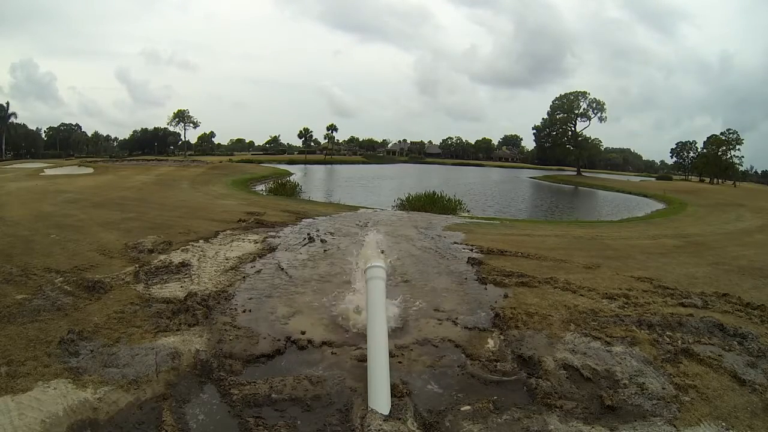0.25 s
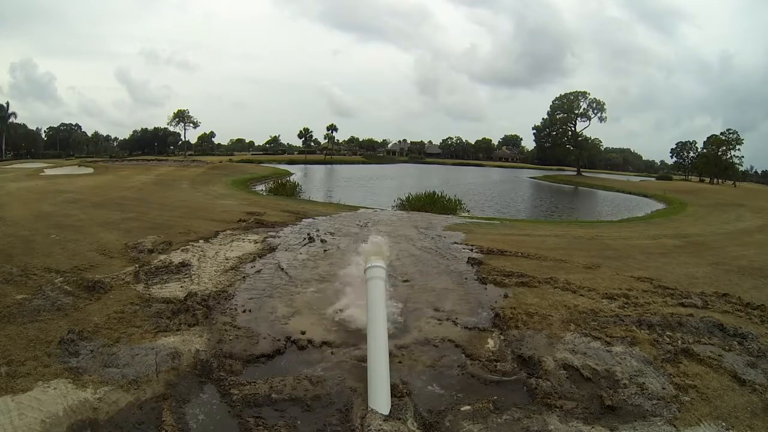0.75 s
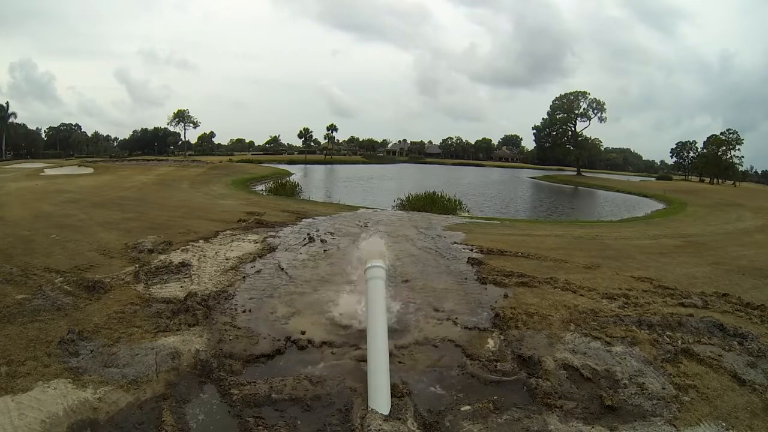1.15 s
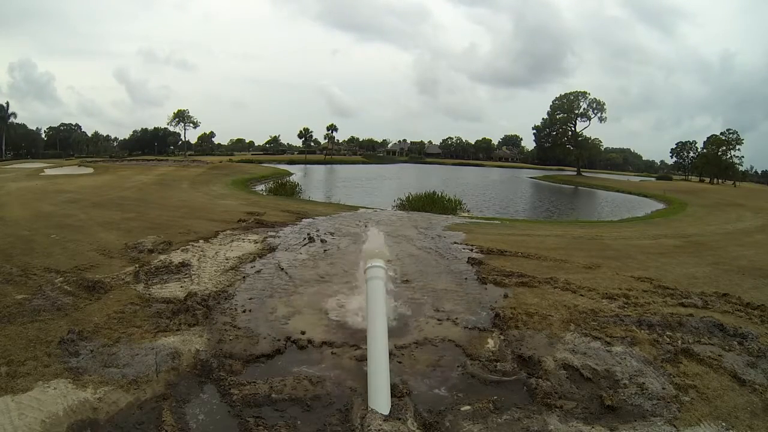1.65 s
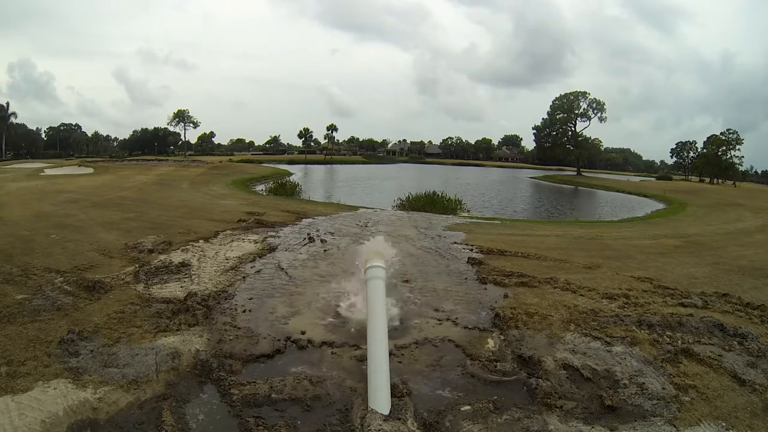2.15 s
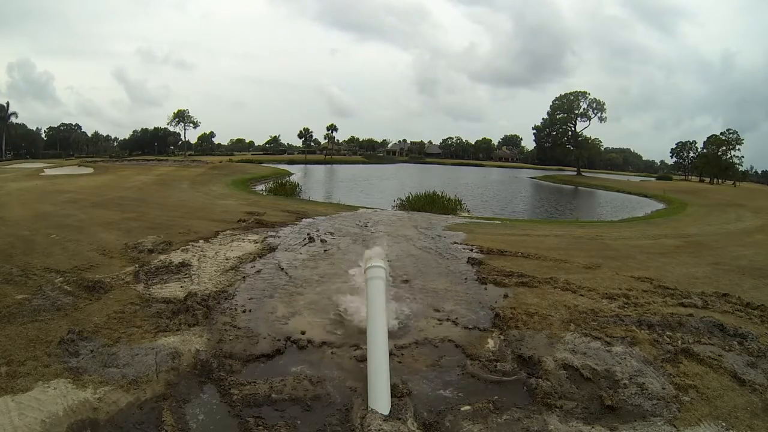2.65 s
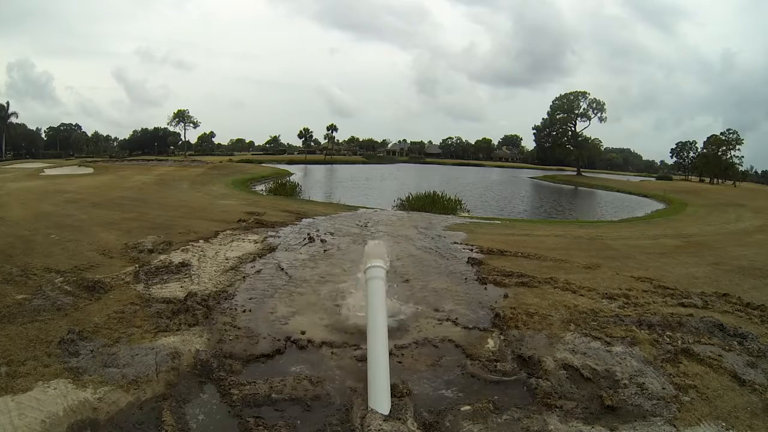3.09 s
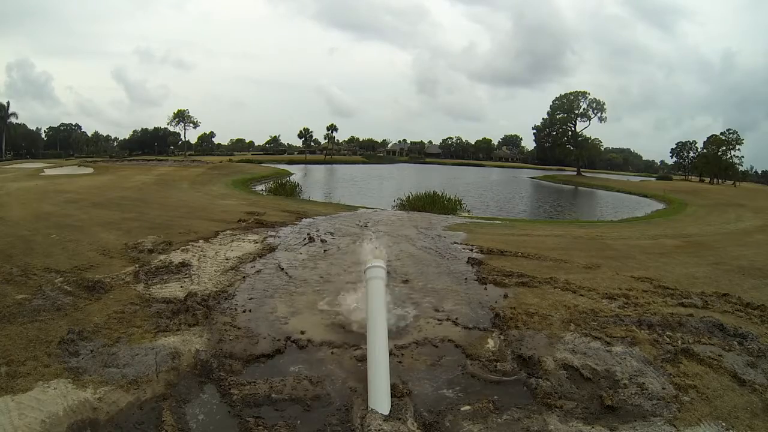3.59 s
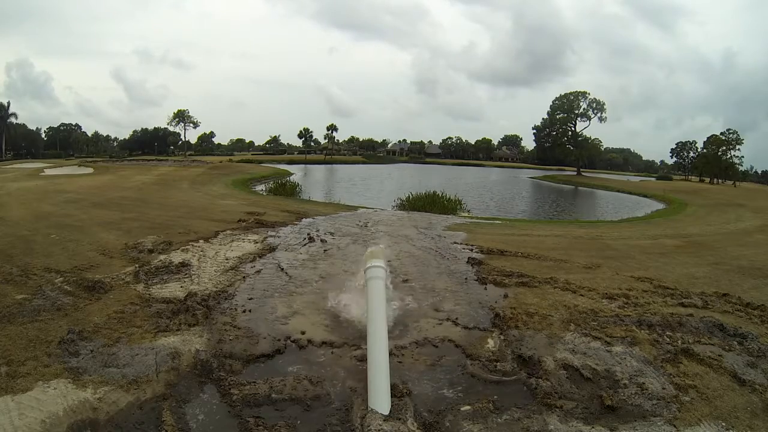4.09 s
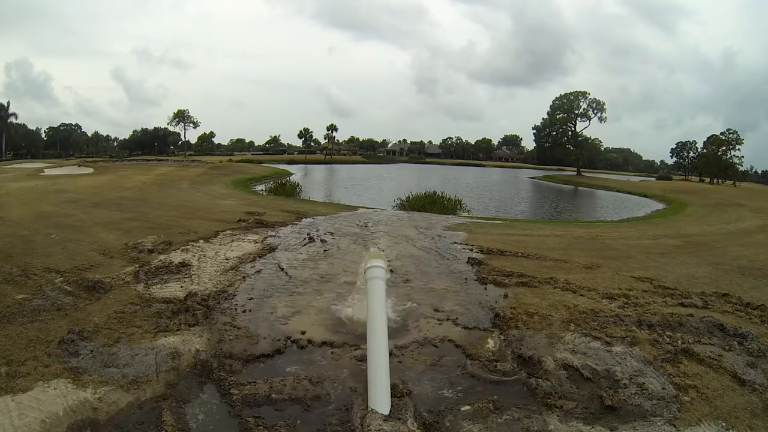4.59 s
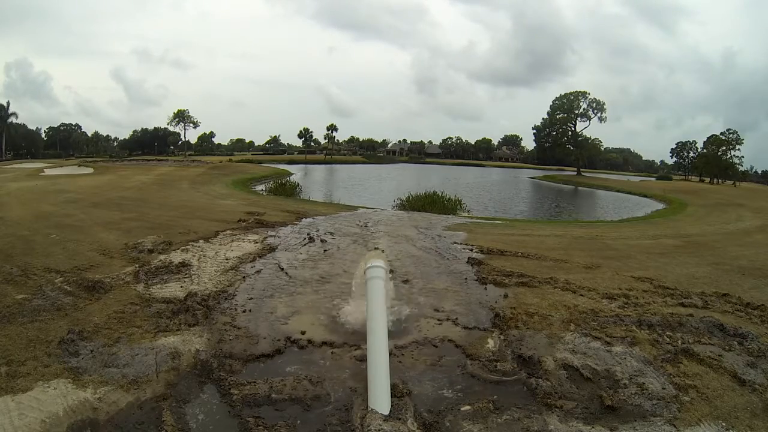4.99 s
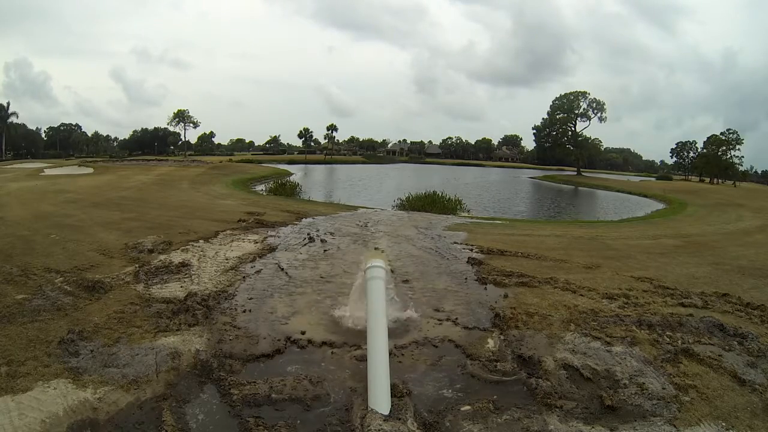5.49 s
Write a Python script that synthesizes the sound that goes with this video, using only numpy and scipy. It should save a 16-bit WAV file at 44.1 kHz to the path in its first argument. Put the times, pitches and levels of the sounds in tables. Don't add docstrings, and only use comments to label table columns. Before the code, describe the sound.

Outdoors on open ground, a broken stream of water pours steadily onto mud near a small encased camera. Low gurgling and mid splashing fluctuate throughout; air pockets gloop and plop, and slaps grow more frequent after about two seconds. Behind are soil thuds, a low steady engine hum and soft wind buffeting. Mono, dry, coloured by case resonances, with dull extreme treble.

```python
import sys
import numpy as np
from scipy import signal
from scipy.fft import rfft, irfft
from scipy.io import wavfile
from scipy.ndimage import uniform_filter1d, map_coordinates

SR = 44100
rng = np.random.default_rng(int(sys.argv[2]) if len(sys.argv) > 2 else 0)


def unload_wav(signal):
    wavfile.write(
        sys.argv[1],
        SR,
        np.round(np.clip(np.atleast_2d(signal).T, -1, 1) * 32767).astype(np.int16),
    )


def ratio_of_db(decibels):
    return 10 ** (np.asarray(decibels, float) / 20)


N = 253134


def unit(x):
    return x / np.sqrt(np.mean(x ** 2) + 1e-20)


def curves(rows):
    s, *cols = np.transpose(rows)
    return [np.interp(np.arange(N) / SR, s, c) for c in cols]


def wobble(rate):
    knots = rng.standard_normal(400 + N // 100)
    return map_coordinates(knots, [np.arange(N) * min(rate, 400) / SR])


def coloured(x, spectrum):
    m = 2 ** 14
    f, db = np.transpose(spectrum)
    log_f = np.log(np.fft.rfftfreq(m, 1 / SR) + 1)
    gain = ratio_of_db(np.interp(log_f, np.log(f + 1), db)) + 1e-6
    ceps = irfft(np.log(unit(gain)))
    ceps[1:m // 2] *= 2
    ceps[m // 2 + 1:] = 0
    return signal.fftconvolve(x, irfft(np.exp(rfft(ceps))))[:N]


def swells(events, lean, steady_db):
    s, length, db, character = np.transpose(events)[:, :, None]
    t = np.arange(0, N + 64, 64) / SR
    shape = np.exp(-8 * ((t - s) / np.maximum(length, .03)) ** 2)
    bells = ratio_of_db(db + lean * character) ** 2 * shape
    gain = np.sqrt(ratio_of_db(steady_db) ** 2 + bells.sum(0))
    return np.interp(np.arange(N) / SR, t, gain)


WHISTLE_HZ, STEP_HZ = 10645.3, 47.97
WHISTLE_COMB = [-103, -78, -87, -93.5, -98, -95.5, -103, -105, -104]
# [f/Hz], then their [level/dB rms]
STRAY_TONES_HZ = [299.6, 13186.8, 14433]
STRAY_LEVELS = [-75, -97.5, -109]


def electronics():
    tones = [(WHISTLE_HZ + (k - 1) * STEP_HZ, db) for k, db in enumerate(WHISTLE_COMB)]
    tones += list(zip(STRAY_TONES_HZ, STRAY_LEVELS))
    t = np.arange(N) / SR
    return sum(np.sqrt(2) * ratio_of_db(db) * np.sin(2 * np.pi * (hz * t + rng.random())) for hz, db in tones)


# [t/s, firing tone f/Hz]
PUMP_SPEED = [(0, 143.4), (5.3, 143.2), (5.74, 142.2)]
# [eighths of the firing tone, level/dB rms]
SHAFT_ORDERS = [(2, -55.5), (4, -68.5), (6, -69), (7, -67), (8, -53), (10, -68), (12, -70)]


def pump():
    firing_hz, = curves(PUMP_SPEED)
    shaft = 2 * np.pi * np.cumsum(firing_hz + .25 * wobble(5)) / SR / 8
    drone = np.zeros(N)
    for order, db in SHAFT_ORDERS:
        breathing = ratio_of_db(db + 1.16 * wobble(10))
        drone += breathing * np.sin(round(order) * shaft + 2 * np.pi * rng.random())
    return np.sqrt(2) * drone


# [t/s, length/s, strength level/dB, roughness level/dB]
WIND_GUSTS = [(0.17, .61, 0, -4), (0.77, 0.36, -0.5, 6), (1.32, 0.46, 3, -3.5), (1.9, 0.36, 0, -3),
              (2.25, 0.53, -5, -10), (2.75, 0.29, -1.5, -17), (3.1, 0.8, -1.5, 1), (3.65, .37, -11, -3.5),
              (4.15, 0.59, -2, 0), (4.62, 0.65, 0.5, 4.5), (5.13, 0.41, 3, 5), (5.55, .45, -4, 13)]
# [f/Hz, level/dB per Hz]
MOUNT_RUMBLE = [(8, -30.5), (15, 3), (22, 1), (28, 6.5), (36, 8), (45, -4), (55, 5.5), (63, -5), (75, -41),
                (200, -120)]
# [f/Hz, level/dB per Hz]
MOUNT_SHUDDER = [(20, -120), (50, -48), (64, -10), (72, -2), (78, -6.5), (85, -3.5), (94, -19), (110, -29),
                 (250, -120)]


def wind():
    rumble = unit(coloured(rng.standard_normal(N), MOUNT_RUMBLE))
    shudder = unit(coloured(rng.standard_normal(N), MOUNT_SHUDDER))
    buffet = ratio_of_db(-45.5) * swells(WIND_GUSTS, -0.4, steady_db=-9.0) * rumble
    return buffet + ratio_of_db(-54.5) * swells(WIND_GUSTS, 0.37, steady_db=-1.5) * shudder


def patchy(patchy_db):
    z = signal.stft(rng.standard_normal(N + 512), nperseg=512)[2]
    field = uniform_filter1d(rng.standard_normal(z.shape), size=5, axis=0)
    field = uniform_filter1d(field, size=6, axis=1)
    return unit(signal.istft(z * ratio_of_db(patchy_db * unit(field)), nperseg=512)[1][:N])


def grains(mid_hz, octaves, cycles, spread_db, count, size):
    when, low, big = rng.random((count, 3)).T
    hz = (mid_hz * 2 ** (octaves * (2 * low - 1)))[:, None]
    turns = hz * np.arange(size) / SR
    ring = np.sin(2 * np.pi * turns * (1 + 0.16 * turns / cycles))
    ring *= np.exp(-3 * turns / cycles) * (1 - np.exp(-turns))
    strength = ratio_of_db(-spread_db * np.log(1 - .99 * big))[:, None]
    ring *= hz / mid_hz * strength
    at = (when * N).astype(int)[:, None] + np.arange(size)
    return unit(np.bincount(at.ravel(), ring.ravel(), N + size)[:N])


RING_CYCLES = 34


def pockets(events):
    out, t = np.zeros(N + 6000), np.arange(6000) / SR
    for s, db, hz in events:
        ring = np.sin(2 * np.pi * hz * t * (.96 + 2.2 * t))
        envelope = ratio_of_db(db - 60 * t * hz / RING_CYCLES) * (1 - np.exp(-t / 0.0044))
        out[round(s * SR):][:6000] += envelope * ring
    return out[:N]


def burst(events, t60):
    shape, t = np.zeros(N + 2000), np.arange(2000) / SR
    for s, db in events:
        shape[round(s * SR):][:2000] += ratio_of_db(db - 60 * t / max(t60, .002)) * (1 - np.exp(-t / 0.00026))
    return shape[:N] * rng.standard_normal(N)


SLAP_T60_S, TICK_T60_S = 0.0093, 0.0086
# [t/s, peak level/dB, low part level/dB]
MUD_SLAPS = [(0.2217, -46, -8), (0.4923, -51, -11), (0.9548, -39, 3), (2.229, -35, 4), (2.84, -46, -1),
             (2.9941, -39, -2), (3.1774, -31, 1), (3.405, -32, -1), (3.6437, -28, -8), (3.9684, -46, -10),
             (4.1226, -38, -2), (4.1578, -33, -1), (4.3154, -40, -11), (4.3766, -37, 3), (5.025, -42, -8),
             (5.0833, -42, -2), (5.3778, -36, -11), (5.4297, -39, -12), (5.455, -36, -13), (5.485, -41, -7)]
# [t/s, peak level/dB]
CLOSE_DROPS = [(0.12, -57), (0.624, -60), (0.6828, -66), (0.7622, -60), (1.1677, -59), (1.2136, -58),
               (1.5833, -55), (2.4868, -62), (3.1455, -60), (3.1797, -50), (3.2, -57), (3.4074, -53),
               (4.5406, -59), (4.7561, -55), (5.1078, -58), (5.229, -58)]
# [f/Hz, level/dB per Hz]
SPLASH_BAND = [(440, -30), (740, -7), (970, -1), (1190, -3), (1400, 0), (2450, -15), (3180, -37.5),
               (5390, -120)]
# [f/Hz, level/dB per Hz]
CASE_CAVITY = [(1410, -52), (2400, -8.5), (2820, 4), (2980, 2.5), (3190, 0.5), (3450, -21.5), (4480, -44.5),
               (7590, -120)]
# [f/Hz, level/dB per Hz]
FINE_SPRAY = [(2000, -31.5), (3400, 1.5), (3800, -3), (4380, 1.5), (5430, -8), (6040, -8.5), (6510, -2),
              (6790, 0.5), (7500, -6.5), (8230, -3.5), (9560, -11), (10200, -12.5), (10400, -12),
              (13500, -25), (22000, -120)]


def slaps():
    s, db, low_db = np.transpose(MUD_SLAPS)
    low = burst(np.c_[s, db + low_db], SLAP_T60_S)
    middle = burst(np.c_[s, np.minimum(db, -38.5)], SLAP_T60_S)
    slugs = ratio_of_db(-8.0) * coloured(low, SPLASH_BAND)
    slugs += ratio_of_db(-2.0) * coloured(middle, CASE_CAVITY)
    slugs += ratio_of_db(-20.5) * coloured(middle, FINE_SPRAY)
    tick_band = [(4000, -44), (6500, 8), (9000, 3), (12000, -16), (15000, -36)]
    return slugs + ratio_of_db(5) * coloured(burst(CLOSE_DROPS, TICK_T60_S), tick_band)


# [t/s, length/s, strength level/dB, weight level/dB]
PIPE_SURGES = [(0.02, 0.43, -1, 0.5), (0.24, 0.054, 0.5, 2.5), (0.51, 0.4, -1.5, -2), (0.69, 0.11, 3.5, -2),
               (0.95, 0.23, -0.5, -6), (1.03, 0.1, 0.5, 2), (1.24, 0.21, 0.5, -3), (1.47, 0.23, -1, -6.5),
               (1.65, 0.13, 1.0, 0.0), (1.87, 0.16, 0.5, -1), (2.12, 0.14, 0, -3.5), (2.23, 0.13, 0.5, 0),
               (2.48, 0.16, 0.5, -5), (2.66, 0.21, -0.5, -2.5), (2.85, 0.12, 2.5, -0.5),
               (3.0, 0.076, 1, 1.5), (3.21, 0.11, 3, -2), (3.39, 0.28, -2, 1), (3.61, 0.15, -5, -11),
               (3.71, 0.18, 2, 1.5), (3.97, 0.08, 2.5, 3.5), (4.15, 0.71, -3, -4), (4.35, 0.17, -4, 3.5),
               (4.55, 0.17, -0.5, 2), (4.71, 0.16, 1, -1), (4.89, 0.29, -0.5, 2), (5.14, 0.37, 0.5, 0.5),
               (5.4, 0.28, 0.5, 1.5), (5.6, 0.17, 1, 1), (5.72, 0.13, -0.5, 0.0)]
# [f/Hz, level/dB per Hz]
GURGLE_BAND = [(200, -27), (330, -0.5), (450, 1), (560, 0), (680, -5.5), (780, -14), (1000, -49.5),
               (1800, -120)]
# [f/Hz, level/dB per Hz]
SOIL_THUD = [(90, -32), (105, 2), (160, -4.5), (200, -8), (260, -8), (340, -11.5), (500, -32), (1200, -120)]
# [f/Hz, level/dB per Hz]
MIST_HISS = [(1500, -40), (3500, 0), (6000, -1), (9000, -5), (10500, -5), (11200, -3.5), (12000, -5.5),
             (13200, 0), (14300, -1.5), (15000, -2), (15300, -5)]
# [t/s, peak level/dB, pitch f/Hz]
BIG_POCKETS = [(0.02, -35, 576), (1.628, -40, 508), (1.793, -45, 488), (2.491, -43, 483), (2.668, -49, 525),
               (3.017, -46, 436), (3.178, -39, 562), (3.64, -46, 413), (3.968, -37, 513),
               (4.308, -36.5, 522), (4.376, -40, 518), (4.477, -43, 554), (4.54, -40, 490),
               (4.59, -46, 540), (4.962, -42, 525), (5.076, -53, 547), (5.34, -39, 510), (5.541, -40, 645)]
# [t/s, peak level/dB, pitch f/Hz]
SMALL_POCKETS = [(0.108, -34, 1000), (0.631, -34, 1330), (0.68, -32, 1430), (0.847, -48, 1610),
                 (1.043, -34, 1310), (1.211, -43, 1360), (1.279, -46, 1500), (1.451, -35, 1400),
                 (1.498, -32, 1270), (2.093, -34, 1000), (2.226, -37, 1040), (2.671, -36, 1150),
                 (2.999, -34, 990), (3.179, -39, 1320), (3.972, -33, 1410), (4.0, -31, 1370),
                 (4.119, -34, 1330), (4.262, -31, 1240), (4.654, -43, 1250), (4.726, -45, 1170),
                 (4.887, -36, 865), (5.616, -36, 880)]


def water():
    flutter = ratio_of_db(0.54 * wobble(25.06) + 0.17 * wobble(70) + 1.1 * wobble(250))
    drops = grains(4450, 1.35, 1.24, spread_db=2.5, count=12000, size=64)
    bubbles = grains(1000, 1.5, 9, spread_db=3, count=2500, size=900)
    jet = unit(flutter * (patchy(patchy_db=1.03) + 0.45 * drops))

    heavy = swells(PIPE_SURGES, 1.0, steady_db=-3.0)
    middling = swells(PIPE_SURGES, 0.17, steady_db=-2.0)
    lighter = swells(PIPE_SURGES, -0.4, steady_db=-5.9)
    light = swells(PIPE_SURGES, -0.48, steady_db=-2.0)

    gurgle = ratio_of_db(-60.5) * heavy * unit(coloured(jet + .12 * bubbles, GURGLE_BAND))
    splash = ratio_of_db(-54.5) * middling * unit(coloured(jet + 0.1 * bubbles, SPLASH_BAND))
    cavity = ratio_of_db(-60.5) * lighter * unit(coloured(jet, CASE_CAVITY))
    spray = ratio_of_db(-66) * light * unit(coloured(jet, FINE_SPRAY))
    ground = ratio_of_db(-56.0) * heavy ** 0.73 * unit(coloured(patchy(patchy_db=-0.1), SOIL_THUD))
    mist = ratio_of_db(-77.5) * light ** 0.31 * unit(coloured(jet + 3.1 * rng.standard_normal(N), MIST_HISS))
    air = ratio_of_db(-3.0) * pockets(BIG_POCKETS) + ratio_of_db(-1.0) * pockets(SMALL_POCKETS)
    return gurgle + splash + cavity + spray + ground + mist + air + slaps()


def scene():
    return (water() + pump() + wind())[None]


# [f/Hz, half width f/Hz, depth 0-1]
CASE_NOTCHES = [(2420, 62, 0.45), (3430, 100, 0.07), (3600, 100, 0.31), (3990, 59, 0.2), (4720, 83, 0.15),
                (6230, 260, 0.3), (8600, 160, 0.34), (9300, 150, 0.5), (10640, 690, 0.08)]
# [f/Hz, chance 0-1]
BAND_DROPOUTS = [(12400, 0), (13000, .1), (14000, .25), (14800, .42), (15250, .75)]


def camera(x):
    hz, _, z = signal.stft(x, SR, nperseg=1024)
    case = np.ones(len(hz))
    for centre, half_width, depth in CASE_NOTCHES:
        case *= 1 - np.clip(depth, 0, .9) / (1 + ((hz - centre) / half_width) ** 2)
    dice = rng.random((len(hz) // 4 + 1, z.shape[-1] // 3 + 1))
    dice = dice.repeat(4, 0).repeat(3, 1)[:len(hz), :z.shape[-1]]
    chance = np.interp(hz, *np.transpose(BAND_DROPOUTS))[:, None]
    kept = np.where(dice < chance, .03, 1)
    return signal.istft(z * case[:, None] * kept, SR, nperseg=1024)[1][:, :N]


def roll_off(x):
    return signal.sosfilt(signal.butter(12, 15260, fs=SR, output="sos"), x)


def record(dry):
    mix = camera(dry) + electronics()
    return roll_off(mix)


dry = scene()
out = record(dry)
unload_wav(out)
```